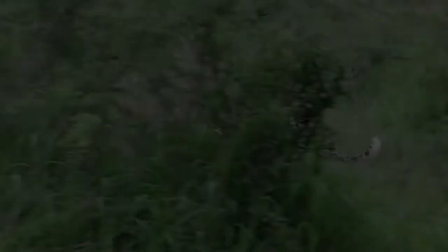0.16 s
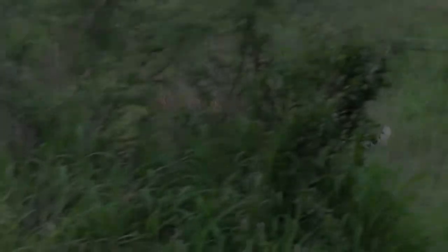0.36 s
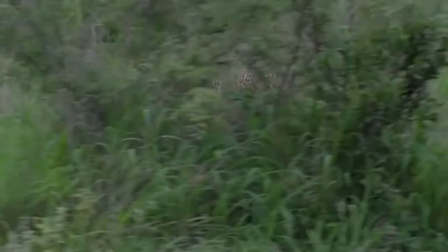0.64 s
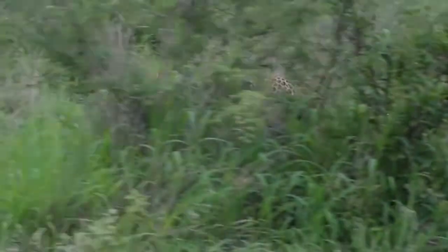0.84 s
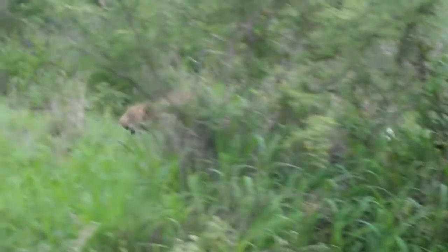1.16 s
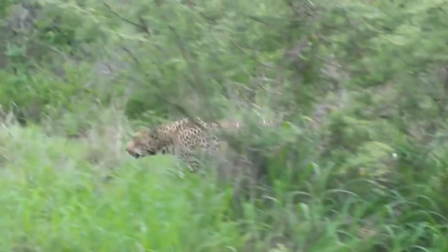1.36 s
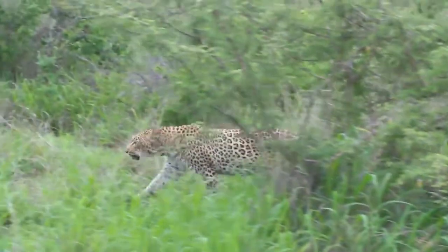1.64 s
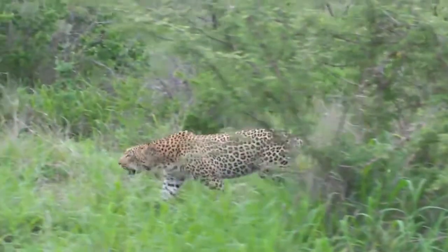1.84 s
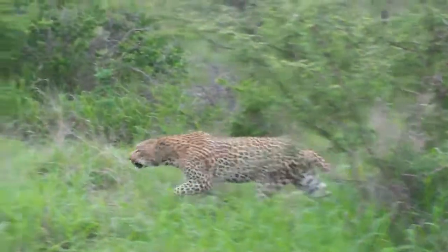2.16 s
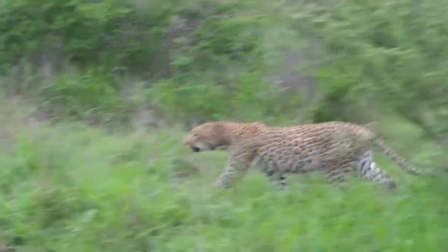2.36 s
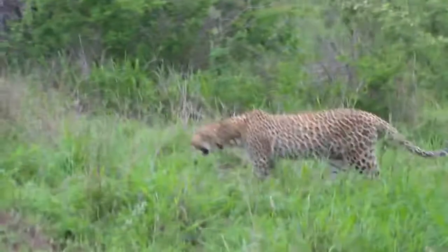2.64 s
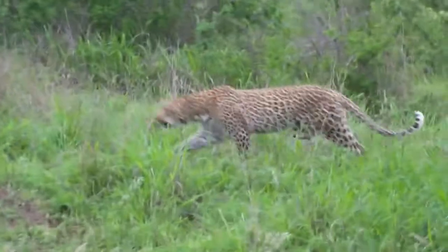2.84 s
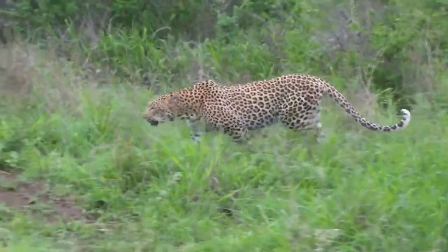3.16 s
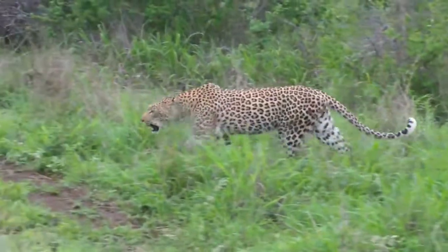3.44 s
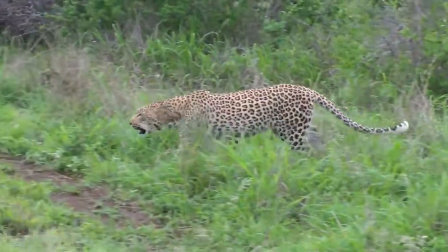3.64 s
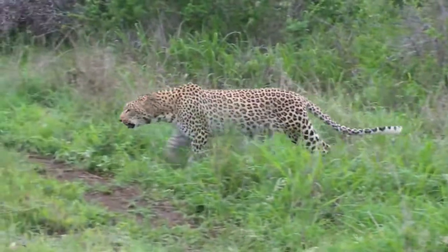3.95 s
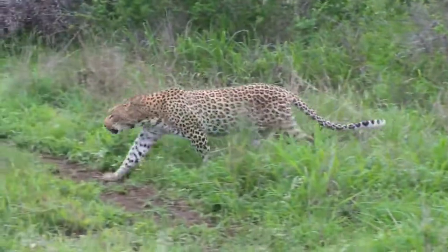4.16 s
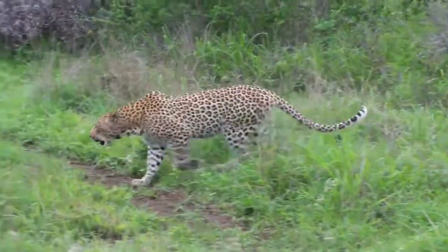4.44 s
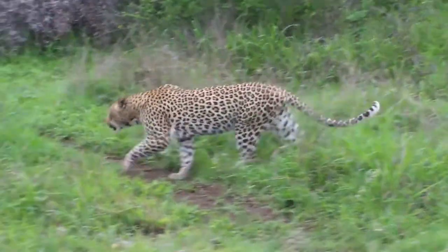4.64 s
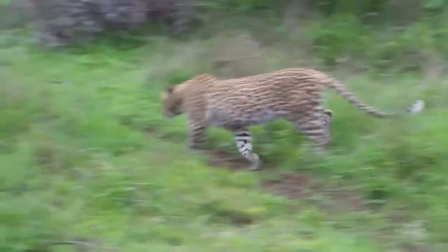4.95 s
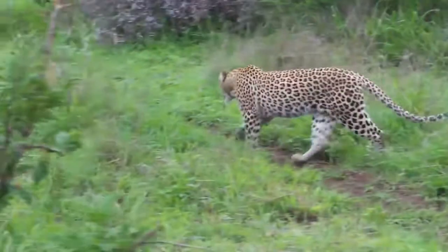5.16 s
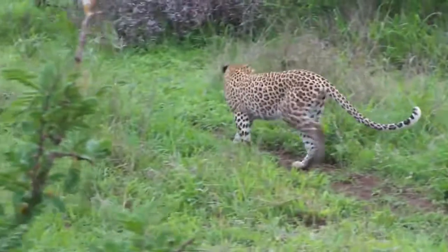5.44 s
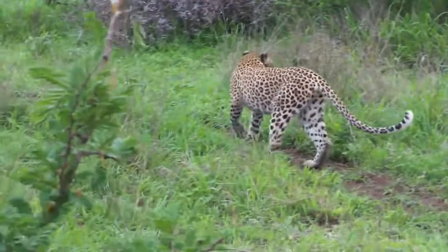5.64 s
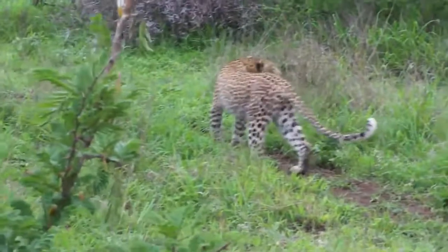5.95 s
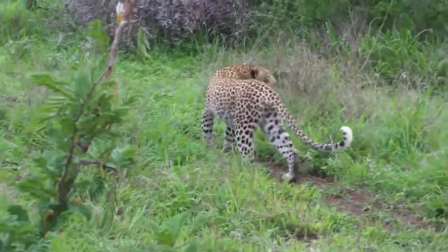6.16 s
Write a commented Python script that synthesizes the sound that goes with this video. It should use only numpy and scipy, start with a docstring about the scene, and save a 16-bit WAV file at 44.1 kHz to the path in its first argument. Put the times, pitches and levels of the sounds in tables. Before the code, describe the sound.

Rough, pulsing big cat calls rasp out and back like a handsaw, fading in over shrill insects, with a brief crackle of dry stalks late.

```python
"""Leopard sawing in grassland

A leopard gives eight hoarse outward grunts, with a softer inward snore before each. In a grunt, slow throat
pulses ring resonances that arch as the jaws move, and torn air rasps; in a snore, air flutters the palate.
Wavering tones and filtered noise make insects, sliding tones a far bird, and tiny noise puffs dry stalks.
The bush adds a short echo to the cat; the whole sound fades in and a gain control softens loud moments."""
import sys
import numpy as np
from scipy import signal
from scipy.fft import rfft, irfft, next_fast_len
from scipy.io import wavfile
from scipy.ndimage import uniform_filter1d, map_coordinates

SR = 44100
rng = np.random.default_rng(int(sys.argv[2]) if len(sys.argv) > 2 else 0)


def store_wav(level_fs):
    """Save 16-bit WAV to argv[1]."""
    pcm = np.round(np.clip(np.atleast_2d(level_fs), -1, 1) * 32767)
    wavfile.write(sys.argv[1], SR, pcm.T.astype(np.int16))


N = 277830  # samples, 6.3 s

# insect chorus over time: (time [s], level [dB])
INSECT_LEVELS = [(0, -49), (1.3, -45.5), (2.5, -43.5), (3.3, -46), (4.2, -47.5), (5.1, -47), (6.3, -47.5)]
# colour of the insect hiss: (frequency [Hz], relative level [dB])
INSECT_SPECTRUM = [(2820, -44), (4800, -31), (5000, -31), (7070, -5), (7550, 0), (8110, -2.5), (10900, -29),
                   (14200, -66.5), (22000, -120)]
# insects that stand out of the chorus: (frequency [Hz], relative level [dB])
INSECT_SINGERS = [(6898, 3.5), (7150, -4.5), (7257, 3), (7352, -9.5), (7567, -13), (7690, -5.5), (7818, 2),
                  (8011, -1), (8518, -12.5), (8741, -6.5)]
# colour of the open air: (frequency [Hz], relative level [dB])
OPEN_AIR_SPECTRUM = [(20, -17.5), (60, -21), (110, -5), (200, 4.5), (400, -3), (700, -6.5), (1100, -9),
                     (2200, -13.5), (2700, -21.5), (3050, -40), (3500, -29), (4600, -33), (5100, -47),
                     (9000, -57), (15000, -83.5)]
# how alike the two ears hear the surroundings: (frequency [Hz], likeness [-1 to 1])
EAR_LIKENESS = [(25, .6), (70, 0.59), (200, 1), (550, 0.19), (1100, 0.1), (2400, 0.11), (5000, 0.3),
                (8000, 0.66), (11000, .7)]
# inward snores: (start [s], length [s], flutter level [dB], air level [dB], rise to the crest [dB])
SNORES = [(.058, .17, -34, -58, 4), (0.667, 0.39, -40.5, -61, 14.5), (1.548, 0.25, -35.5, -49.5, 17),
          (2.34, 0.26, -32, -46.5, 8.5), (3.101, 0.29, -29.5, -45, 11.5), (3.988, 0.24, -29.5, -46, 12.5),
          (4.73, 0.28, -32, -52, 9), (5.511, 0.33, -35, -59, 12)]
# colour of the palate's flutter: (frequency [Hz], relative level [dB])
FLUTTER_SPECTRUM = [(41, -62.5), (70, -36), (161, -3), (182, -4), (195, 6), (297, -12), (347, 1.5),
                    (411, -12), (475, -15.5), (567, -21), (627, -10), (774, -39), (1000, -50.5),
                    (1300, -67.5), (2200, -120)]
# colour of the air drawn in: (frequency [Hz], relative level [dB])
SNORE_AIR_SPECTRUM = [(500, -51.5), (850, -12.5), (1010, -17.5), (1100, -3), (1410, -16), (1520, -5),
                      (1720, 7), (1850, -13), (2160, 1), (2340, -14.5), (2610, -9), (2860, -31.5),
                      (2980, -49), (3100, -44.5), (4030, -64), (6820, -120)]
# how long the bush echo rings: (frequency [Hz], time to fall 60 dB [s])
BUSH_DECAY = [(200, 0.12), (2000, 0.23), (8000, 0.025)]
# outward grunts: (first pulse [s], length [s], throat level [dB], mouth level [dB], rasp level [dB],
# rasp drop over the grunt [dB], rasp tilt [dB per octave], nose level [dB], opening bark [dB],
# moment the mouth is loudest [share of grunt], throat base pitch [Hz], mouth base pitch [Hz],
# pulse rate at the start, at the crest, at the end [pulses per s])
GRUNTS = [ (0.297, 0.3, -14.5, -31.5, -35, 4.5, -9.5, -31.5, 3, 0.43, 274.2, 715, 58.5, 62.3, 56.9),
          (1.08, .365, -13.5, -22.5, -31.5, -5, -2, -40.5, -1, 0.73, 286.5, 616, 42.7, 61.43, 52.8),
          (1.8788, .34, -12.5, -16, -28.5, -2, 1, -30, -1.5, 0.56, 279.3, 664, 44.25, 61.46, 38.9),
          (2.6551, 0.37, -13, -16.5, -28.5, -1.5, -0.5, -31.5, 0.5, 0.63, 279.5, 672, 40.04, 60.24, 38.9),
          (3.4681, .38, -14.5, -14, -30, -3.5, 1.5, -31, 4, 0.65, 285, 687, 44.67, 58.92, 60.97),
          (4.2808, .355, -13, -15.5, -36, -1, 4.5, -31.5, 8, 0.57, 282.8, 658, 42.41, 59.64, 40.7),
          (5.0641, 0.36, -15.5, -26, -34.5, 5.5, 3, -30.5, -2.5, 0.69, 263.4, 621, 38.5, 54.05, 52.6),
          (5.8923, .38, -15, -29, -32.5, 1.5, -2.5, -40, 2.5, 0.57, 265, 590, 37.45, 53.02, 45.8)]
# upper resonances of the muzzle: (base frequency [Hz], width [Hz], relative level [dB])
MUZZLE_RESONANCES = [(977, 130, -6.5), (1233, 77, 0), (1480, 96, 0), (1758, 69, 2.5), (1955, 86, 0.5),
                     (2348, 230, 4.5)]
# colour of the rasp: (frequency [Hz], relative level [dB])
RASP_SPECTRUM = [(500, -54.5), (850, -10.5), (1070, -10), (1210, -6), (1460, 4), (1620, -5), (1940, -1.5),
                 (2510, -13), (2980, -31), (3200, -52.5), (4160, -76), (7040, -120)]
# colour of the bright, airy spray above the rasp: (frequency [Hz], relative level [dB])
SPRAY_SPECTRUM = [(2800, -40), (3050, -15.5), (3450, -4), (4100, -16), (4600, -7), (5050, -29), (5700, 3),
                  (6800, 5), (9000, -2), (11000, -17.5), (13000, -48.5)]
# the jaws bend a resonance: (widest moment [share of grunt], start pitch [factor], end pitch [factor])
THROAT_ARCH = (0.4, 0.797, 0.602)
MOUTH_ARCH = (0.45, 0.817, .7)
# how a sound swells and dies: (attack [s], rise [dB], release [s], fall [dB])
THROAT_SHAPE = (0.071, 18.3, 0.13, 17.4)
RASP_SHAPE = (0.034, 17.5, 0.14, 10.5)
NOSE_SHAPE = (0.083, 18, 0.21, 17)
RUSTLE_SHAPE = (.015, 20, .02, 15)
# dry stalks snapping: (time [s], strength [dB])
STALK_SNAPS = [(.3544, -38), (2.7436, -21), (5.1474, -16.5), (5.1557, -28), (5.182, -16.5), (5.1975, -9.5),
               (5.2026, -7), (5.2446, -14.5), (5.2538, -21)]
# the cat brushes through dry grass: (start [s], length [s], level before colouring [dB])
GRASS_RUSTLE = (5.135, 0.1, -47.5)
# colour of dry stalks: (frequency [Hz], relative level [dB])
STALK_SPECTRUM = [(1000, -38), (2500, -13), (4000, -18.5), (5500, -9), (7000, 7.5), (9000, -9.5),
                  (12000, -26.5), (15500, -48)]
# harsh catches in the throat: (time [s], strength [dB])
THROAT_CATCHES = [(0.584, -9), (1.44, -15), (2.1631, 1.5), (2.205, -22), (2.6863, -3), (2.741, -8),
                  (2.931, 4), (2.9648, -1.5), (3.008, -13), (3.513, -3.5), (3.827, -14), (4.5917, -8),
                  (5.245, -1.5), (5.948, -14), (6.006, -2.5)]
# bird whistles: (start [s], length [s], start pitch [Hz], end pitch [Hz], level before flicker [dB])
BIRD_WHISTLES = [(0.742, 0.28, 3500, 3350, -64.5), (0.8, 0.21, 6400, 5930, -54),
                 (1.113, 0.16, 3640, 3240, -65), (1.634, 0.24, 3580, 3290, -66)]
# hard flaps of the soft palate: (time [s], knock strength [dB], rasp strength [dB])
PALATE_FLAPS = [(0.919, -2.5, -21.5), (.962, -4, -20), (1.575, -6, -28), (1.597, -2.5, -32),
                (1.644, -3.5, -23), (1.759, -1, -29), (1.78, -1.5, -12.5), (1.8, -9.5, -35),
                (2.47, -2, -19), (2.51, -5.5, -15), (2.559, -5, -13.5), (3.245, -16, -19.5),
                (3.326, 2, -19), (3.357, -2, -39), (4.002, -5.5, -23), (4.13, 3, -13.5),
                (4.146, -10.5, -10), (4.777, -7, -18), (4.906, -3.5, -22.5)]
# wet clicks of the mouth: (time [s], strength [dB])
MOUTH_CLICKS = [(2.273, -14), (2.2927, -14), (4.178, -16), (4.2048, -20)]
# shading of the voice heard from behind: (frequency [Hz], gain [dB])
BEHIND_SHADING = [(500, -0.5), (700, -3.5), (930, 4.5), (1300, -4), (1900, -6), (2400, -17), (6000, -13)]

OPEN_AIR_DB = -45.5
SNORE_CREST, SNORE_FALL_DB = 0.87, 4.5  # share of the snore where it is strongest, and its fall from there
BEAT_CREST = 0.55  # share of the grunt where the pulse rate reaches its crest value
MOUTH_RISE_DB, MOUTH_FALL_DB = 19, 20  # how far the mouth swells and then dies away
BARK_S, BARK_WIDTH_S = 0.052, 0.021  # the first shove of air: when, and how broad
RASP_GAPE_LIFT = 0.07  # share by which the muzzle's resonances rise as the jaws open
TURN_S, TURN_LENGTH_S = 5.22, 0.53  # the cat turns its back
THRESHOLD_DB, RECOVERY_DB_PER_S = -15, 20  # gain control: where it starts, how fast it lets go
GAIN_ATTACK_S, LISTEN_S = 0.016, 0.025
FADE_FROM, FADE_S = 0.25, 1.0  # fade-in: first gain, and time to full level
TOP_HZ = 15700  # nothing is heard from here up


def amp(db):
    """Turn decibels into a plain multiplier."""
    return 10 ** (np.asarray(db) / 20)


def unit(x):
    """Scale a sound to an average (rms) strength of 1."""
    return x / np.sqrt(np.mean(x ** 2) + 1e-20)


def clock():
    """The time of every sample in seconds."""
    return np.arange(N) / SR


def along(points, hz):
    """Read a table of (frequency [Hz], value) at hz, on a log frequency scale."""
    f, v = np.transpose(points)
    return np.interp(np.log(hz + 1), np.log(f + 1), v)


def curves(rows, t):
    """Read each column after the time column at the times t."""
    s, *columns = np.transpose(rows)
    return [np.interp(t, s, column) for column in columns]


def wobble(rate, n):
    """A smooth random curve with this many random points a second."""
    points = rng.standard_normal(int(n * rate / SR) + 4)
    return map_coordinates(points, [np.arange(n) * rate / SR])


def arch(u, crest, first, top, last, power=2):
    """A curve from first (u = 0) over top (u = crest) to last (u = 1)."""
    crest = np.clip(crest, 0.05, 0.95)
    before = np.maximum(1 - u / crest, 0)
    after = np.maximum((u - crest) / (1 - crest), 0)
    return top + (first - top) * before ** power + (last - top) * after ** power


def envelope(age, length, shape):
    """Attack, hold and release, in dB below the held level."""
    attack, rise_db, release, fall_db = shape
    rising = rise_db * np.maximum(1 - age / attack, 0)
    falling = fall_db * np.maximum(1 + (age - length) / release, 0) ** 2
    return -rising - falling


def colour(x, spectrum, size=8192):
    """Filter a sound to a spectrum without pre-ringing; the filter has an energy of 1."""
    gain = np.maximum(amp(along(spectrum, np.fft.rfftfreq(size, 1 / SR))), 1e-6)
    # folding the cepstrum moves the whole ring after the strike (minimum phase)
    cepstrum = irfft(np.log(gain))
    cepstrum[1:size // 2] *= 2
    cepstrum[size // 2 + 1:] = 0
    ring = irfft(np.exp(rfft(cepstrum)))
    return signal.fftconvolve(x, ring / np.linalg.norm(ring))[:len(x)]


def band(x, low_hz, high_hz, order):
    """Keep mainly the frequencies between low_hz and high_hz."""
    return signal.sosfilt(signal.butter(order, [low_hz, high_hz], "band", fs=SR, output="sos"), x)


def resonate(x, hz, width_hz):
    """Ring a resonance whose pitch may move; a narrower one rings longer."""
    turn = np.exp(2j * np.pi * np.cumsum(hz) / SR)
    ringing = signal.lfilter([1], [1, -np.exp(-np.pi * width_hz / SR)], x / turn)
    return (turn * ringing).imag


def strikes(times, sizes, n):
    """Single-sample pulses at the given times; those past the end are dropped."""
    places = np.clip(np.round(times * SR).astype(int), 0, n)
    return np.bincount(places, sizes, n + 1)[:n]


def puffs(pulses, life):
    """Each pulse lets out a dying puff of noise with the pulse's energy; life is in seconds."""
    gate = signal.lfilter([1], [1, -np.exp(-1 / (life * SR))], pulses)
    return gate * rng.standard_normal(len(pulses)) * np.sqrt(2 / (life * SR))


def level(x, db, span=0.053):
    """Set the slow loudness of x to db; the single pulses keep their shape."""
    window = np.hanning(int(span * SR))
    power = np.abs(signal.fftconvolve(x * x, window / window.sum(), "same"))
    # the small floor limits the boost of near silence
    return amp(db) * x / np.sqrt(power + power.mean() / 500)


def stretch(start, length, lead=0.015, tail=0.019):
    """The sample times of one call and a gate that opens and closes softly around it."""
    first = max(int((start - lead) * SR), 0)
    last = min(int((start + length + tail) * SR), N)
    t = np.arange(first, last) / SR
    return t, np.interp(t - start, [-lead, 0, length, length + tail], [0, 1, 1, 0])


def add(track, t, sound):
    """Mix one call into a track at its own time."""
    track[round(t[0] * SR):][:len(sound)] += sound


def spread(spectrum, lead=0.000016):
    """Stereo noise of rms 1 that reaches the left ear a little sooner (lead in seconds)."""
    hz = np.fft.rfftfreq(N, 1 / SR)
    # the mix of shared and opposite noise sets how alike the ears are
    turn = np.arccos(np.clip(along(EAR_LIKENESS, hz), -1, 1)) / 2
    noise = rfft(rng.standard_normal((2, N))) * amp(along(spectrum, hz))
    mid, side = noise * [np.cos(turn), np.sin(turn)]
    right = (mid - side) * np.exp(-2j * np.pi * hz * lead)
    return unit(irfft(np.array([mid + side, right]), N))


def patchy(x, depth_db, size=2048):
    """Narrow bands of x swell and fade on their own over half a second or so."""
    z = signal.stft(x, nperseg=size)[2]
    field = rng.standard_normal(z.shape[1:])
    field = uniform_filter1d(uniform_filter1d(field, size=2, axis=0), size=30, axis=1)
    return unit(signal.istft(z * amp(depth_db * unit(field)), nperseg=size)[1][:, :N])


def insects(waver_hz=22, singers_db=-10):
    """Many insects blur into a patchy hiss; a few thin, wavering tones stand out of it."""
    singers = 0
    for hz, db in INSECT_SINGERS:
        phase = 2 * np.pi * np.cumsum(hz + waver_hz * wobble(110, N)) / SR
        loudness_db = db + 5.1 * wobble(1.4, N) + 1.8 * wobble(30, N)
        singers = singers + amp(loudness_db) * np.sin(phase)
    hiss = patchy(spread(INSECT_SPECTRUM), depth_db=4.0) * amp(0.14 * wobble(40, N))
    chorus = hiss + amp(singers_db) * unit(singers)
    # a touch louder on the left
    return chorus * amp(curves(INSECT_LEVELS, clock())[0]) * amp([[0.7], [-0.7]])


def open_air():
    """The murmur of the open air: coloured stereo noise with an unsteady level."""
    return spread(OPEN_AIR_SPECTRUM) * amp(OPEN_AIR_DB + 2.6 * wobble(6.9, N))


def snore(row, rate=38, unevenness=0.26, wander=0.015):
    """Air drawn back in swells, flutters the palate at a slow, uneven rate and whistles in the mouth."""
    start, length, flutter_db, air_db, swell_db = row
    t, gate = stretch(start, length, tail=0.022)
    n = len(t)
    draw_db = arch((t - start) / length, SNORE_CREST, -swell_db, 0, -SNORE_FALL_DB, power=1.35)
    # 32 flaps are more than one snore needs
    gap_chance, size_chance = rng.standard_normal((2, 32))
    gaps = np.exp(unevenness * gap_chance) / rate
    times = start - t[0] + np.cumsum(gaps) - gaps[0]
    pulses = strikes(times, amp(3.7 * size_chance), n)
    flutter = colour(pulses + 0.3 * puffs(pulses, life=0.01), FLUTTER_SPECTRUM)
    rush = puffs(pulses, life=0.007) + 0.009 * rng.standard_normal(n)
    whistle_hz = np.linspace(1770, 1640, n) * (1 + wander * wobble(23, n))
    whistle = resonate(rush, whistle_hz, width_hz=24)
    air = unit(colour(rush, SNORE_AIR_SPECTRUM)) + 0.16 * unit(whistle)
    return t, gate * (level(flutter, flutter_db + draw_db) + level(air, air_db + draw_db))


def bush(x):
    """Shrubs scatter a short echo, different at each ear; the bass passes through them."""
    hz, t, z = signal.stft(rng.standard_normal((2, SR // 2)), SR, nperseg=256)
    decay = amp(-60 * t / along(BUSH_DECAY, hz)[:, None])
    tail = signal.istft(z * decay, SR, nperseg=256)[1]
    scattered = band(x, 350, 12000, order=2)[None]
    # two separate echoes: one shared by both ears, one that makes the ears differ
    shared, other = signal.fftconvolve(scattered, tail / np.linalg.norm(tail[0]), axes=1)[:, :N]
    return np.array([shared + 0.2 * other, shared - 0.095 * other])


def throat_tone(pulses, age, throat_hz):
    """The throat rings on from pulse to pulse; a broad shoulder above it moves up during the grunt."""
    gape = np.interp(age, [0.07, 0.14, 0.2, 0.32], [0.042, 0.61, 0.64, 1.0])
    flow = pulses + 0.17 * puffs(pulses, life=0.008) + 0.0018 * rng.standard_normal(len(pulses))
    tone = resonate(flow, throat_hz * (1 - 0.079 * gape), width_hz=17.4)
    tone = resonate(tone, throat_hz * (1.344 + 0.3 * gape), width_hz=250)
    return band(tone, 207, 446, order=3)


def mouth_tone(pulses, mouth_hz):
    """Pulses and hoarse air ring a sharp mouth resonance with a broad shoulder below it."""
    hoarse_flow = pulses + 0.27 * puffs(pulses, life=0.006)
    tone = resonate(hoarse_flow, mouth_hz * 1.0436, width_hz=28.6)
    return band(resonate(tone, mouth_hz * 0.86, width_hz=122), 430, 880, order=3)


def nose_tone(pulses):
    """The nose adds a weak resonance that stays put."""
    return band(pulses + 0.5 * puffs(pulses, life=0.012), 697, 781, order=2)


def muzzle_rasp(bursts, u, tilt_db, wander=0.049, tear_life=0.0051):
    """Air tears through the folds at each pulse and rings the muzzle, higher as the jaws open."""
    n = len(bursts)
    tear = 0.45 * bursts + puffs(bursts, life=tear_life) + 0.01 * rng.standard_normal(n)
    muzzle = 0.2 * unit(tear)
    lift = arch(u, MOUTH_ARCH[0], 1, 1 + RASP_GAPE_LIFT, 0.99) - RASP_GAPE_LIFT / 2
    for hz, width_hz, db in MUZZLE_RESONANCES:
        drift = lift + wander * wobble(8, n)
        tilted_db = db + tilt_db * np.log2(hz / 1500)
        muzzle = muzzle + 0.5 * amp(tilted_db) * unit(resonate(tear, hz * drift, width_hz))
    return colour(muzzle, RASP_SPECTRUM)


def grunt(row, unsteady_db=1.57, scatter_db=2.3):
    """Slack vocal folds slap about 40 to 60 times a second, mostly fastest near mid-call."""
    (first, length, throat_db, mouth_db, rasp_db, sag_db, tilt_db, nose_db, bark_db,
     loudest, throat_hz, mouth_hz, *rates) = row
    t, gate = stretch(first, length)
    n, age = len(t), t - first
    u = age / length  # 0 at the start of the grunt, 1 at its end
    # one push of air: a bark at the start, a held throat tone, a mouth that swells as it gapes
    bark = bark_db * np.exp(-((age - BARK_S) / BARK_WIDTH_S) ** 2)
    throat_db = throat_db + envelope(age, length, THROAT_SHAPE)
    mouth_db = mouth_db + bark + arch(u, loudest, -MOUTH_RISE_DB, 0, -MOUTH_FALL_DB, power=1.35)
    rasp_db = rasp_db + bark - sag_db * (u - 0.5) + envelope(age, length, RASP_SHAPE)
    rasp_db = rasp_db + unsteady_db * wobble(24, n)
    nose_db = nose_db + envelope(age, length, NOSE_SHAPE)
    # both resonances rise and fall with the jaws
    jaw_u = np.minimum(u, 1)
    throat_hz = throat_hz * arch(jaw_u, THROAT_ARCH[0], THROAT_ARCH[1], 0.99, THROAT_ARCH[2], power=2.21)
    mouth_hz = mouth_hz * arch(jaw_u, MOUTH_ARCH[0], MOUTH_ARCH[1], 0.99, MOUTH_ARCH[2], power=1.8)
    # one pulse each time the running count of cycles passes a whole number
    cycles = np.cumsum(arch(u, BEAT_CREST, *rates) * (age >= 0) * (u <= 1)) / SR
    pulse_ages = np.maximum(age[np.searchsorted(cycles, np.arange(int(cycles[-1]) + 1))], 0)
    # the beat is steadiest in mid-call and a little ragged at both ends
    ragged = np.clip(np.abs(pulse_ages - 0.18) / 0.16, 0, 1) ** 3
    time_chance, size_chance, burst_chance = rng.standard_normal((3, len(pulse_ages)))
    times = first - t[0] + pulse_ages + (0.00007 + 0.0003 * ragged) * time_chance
    sizes = amp((1.6 + 2 * ragged) * size_chance)
    pulses = strikes(times, sizes, n)
    bursts = strikes(times, sizes * amp(scatter_db * burst_chance), n)
    throat = level(throat_tone(pulses, age, throat_hz), throat_db)
    mouth = level(mouth_tone(pulses, mouth_hz), mouth_db)
    nose = level(nose_tone(pulses), nose_db)
    rasp = level(muzzle_rasp(bursts, u, tilt_db), rasp_db)
    spray = level(colour(puffs(bursts, life=0.013), SPRAY_SPECTRUM), rasp_db - 20.5)
    return t, gate * (throat + mouth + nose + rasp + spray)


def stalks(snaps_per_s=900, scatter_db=5):
    """Dry stalks crackle as they rub together, and some break in brief, bright snaps."""
    s, db = np.transpose(STALK_SNAPS)
    start, length, rustle_db = GRASS_RUSTLE
    fibres = (rng.random(N) < snaps_per_s / SR) * amp(scatter_db * rng.standard_normal(N))
    rustle_db = rustle_db + envelope(clock() - start, length, RUSTLE_SHAPE)
    rustle = unit(puffs(fibres, life=0.001)) * amp(rustle_db)
    snaps = puffs(strikes(s, amp(db), N), life=0.0038)
    return colour(rustle + snaps, STALK_SPECTRUM)


def catches():
    """Now and then the throat catches and lets out one much harsher tear of air."""
    s, db = np.transpose(THROAT_CATCHES)
    tear = puffs(strikes(s, amp(db), N), life=0.0051)
    return colour(tear, RASP_SPECTRUM) + amp(-19.5) * colour(tear, SPRAY_SPECTRUM)


def bird():
    """Far whistles: flickering pure tones that slide down and level off."""
    song = np.zeros(N)
    for s, length, start_hz, end_hz, db in BIRD_WHISTLES:
        u = np.clip((clock() - s) / length, 0, 1)
        hz = end_hz + (start_hz - end_hz) * (1 - u) ** 2 + 40 * wobble(260, N)
        swell = np.minimum(u * 10, 1) * np.sqrt(1 - u)
        flicker = amp(3.6 * wobble(67, N) + 0.5)
        song += amp(db) * swell * flicker * np.sin(2 * np.pi * np.cumsum(hz) / SR)
    return song


def flaps():
    """The soft palate's hardest flaps knock the throat and let out a rasp of air."""
    s, knock_db, rasp_db = np.transpose(PALATE_FLAPS)
    knock = colour(strikes(s, amp(knock_db), N), FLUTTER_SPECTRUM)
    rasp = colour(puffs(strikes(s, amp(rasp_db), N), life=0.013), SNORE_AIR_SPECTRUM)
    return knock + rasp


def mouth_clicks():
    """The wet mouth clicks: very short puffs of noise."""
    s, db = np.transpose(MOUTH_CLICKS)
    return colour(puffs(strikes(s, amp(db), N), life=0.0018), RASP_SPECTRUM)


def leopard():
    """Inward snores alternate with outward grunts; the head shades the treble once the cat turns away."""
    voice = flaps() + mouth_clicks() + catches()
    for row in SNORES:
        add(voice, *snore(row))
    for row in GRUNTS:
        add(voice, *grunt(row))
    shading = amp(along(BEHIND_SHADING, np.fft.rfftfreq(N, 1 / SR)))
    shaded = irfft(rfft(voice) * shading, N)
    turned = np.clip((clock() - TURN_S) / TURN_LENGTH_S, 0, 1)
    return (1 - turned) * voice + turned * shaded


def lag(x, time):
    """Follow x sluggishly, with the given time constant in seconds."""
    keep = np.exp(-1 / (time * SR))
    return signal.lfilter([1 - keep], [1, -keep], x)


def gain_control(x):
    """Loud sounds turn the gain down quickly; it creeps back up afterwards."""
    loudness_db = 10 * np.log10(lag(np.mean(x * x, axis=0), LISTEN_S) + 1e-12)
    over_db = np.maximum(loudness_db - THRESHOLD_DB, 0)
    # hold the highest excess so far, let down at the recovery rate
    recovery = RECOVERY_DB_PER_S * clock()
    cut_db = np.maximum.accumulate(over_db + recovery) - recovery
    return x * amp(-lag(cut_db, GAIN_ATTACK_S))


def scene():
    """The cat, the grass and the bird in front, echo, insects and open air all around."""
    cat = leopard()
    front = (cat + stalks() + bird()) * amp([[-0.15], [0.15]])
    echo = amp(-14.5) * bush(cat)
    return front + echo + insects() + open_air()


def record(dry):
    """Apply the gain control and the fade-in, then cut everything from TOP_HZ up."""
    sound = gain_control(dry) * np.interp(clock(), [0, FADE_S], [FADE_FROM, 1])
    size = next_fast_len(N + SR // 2)
    kept = np.fft.rfftfreq(size, 1 / SR) < TOP_HZ
    return irfft(rfft(sound, size) * kept, size)[:, :N]


dry = scene()
out = record(dry)
store_wav(out)
```